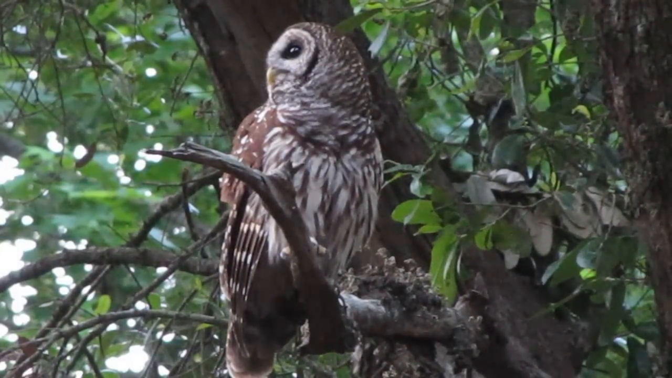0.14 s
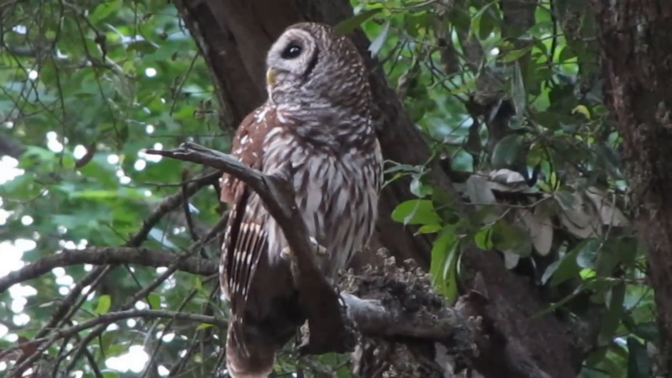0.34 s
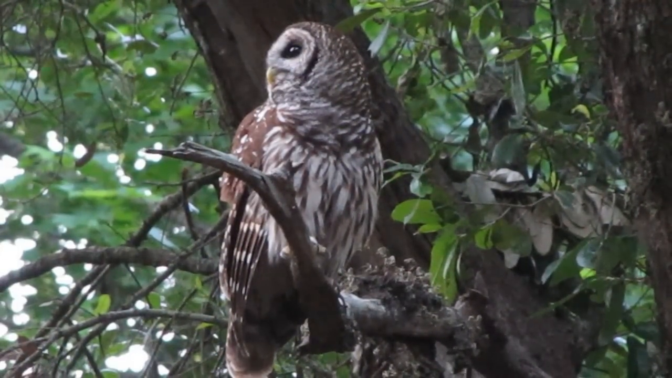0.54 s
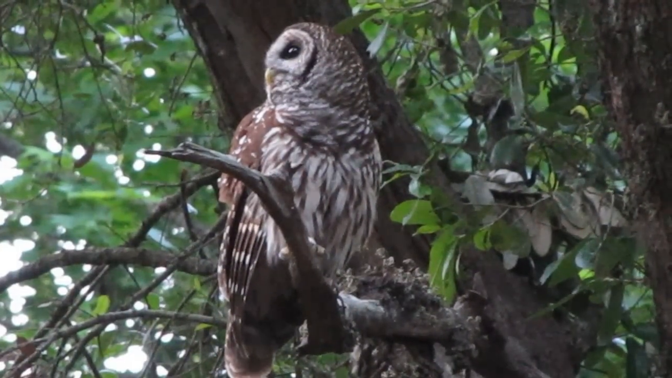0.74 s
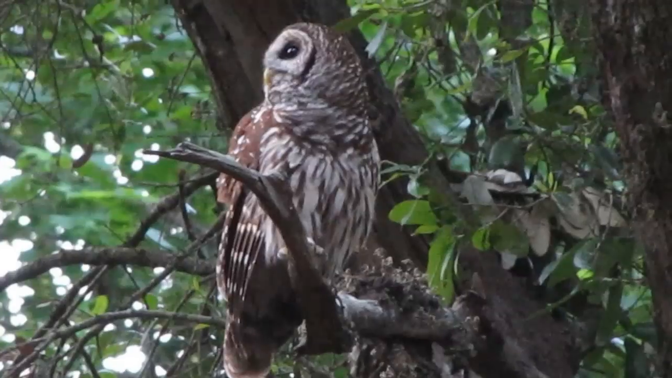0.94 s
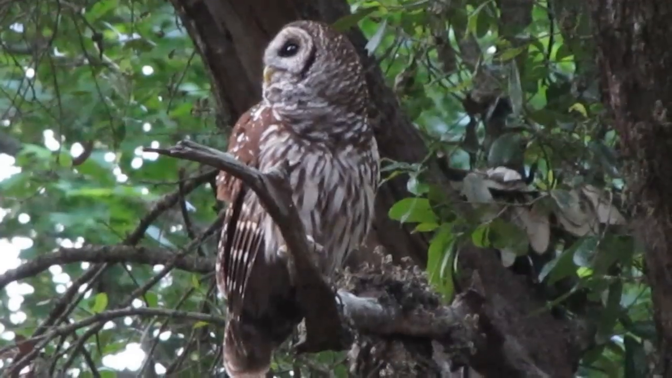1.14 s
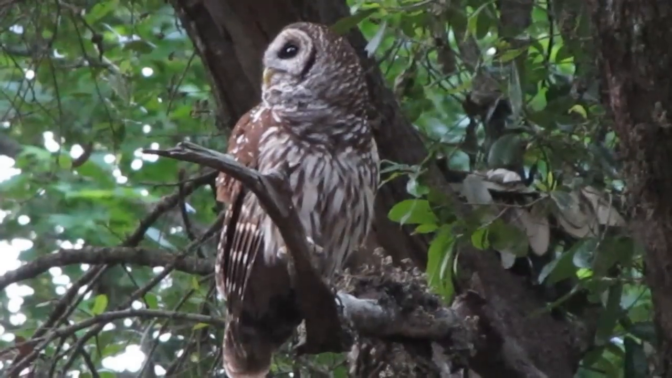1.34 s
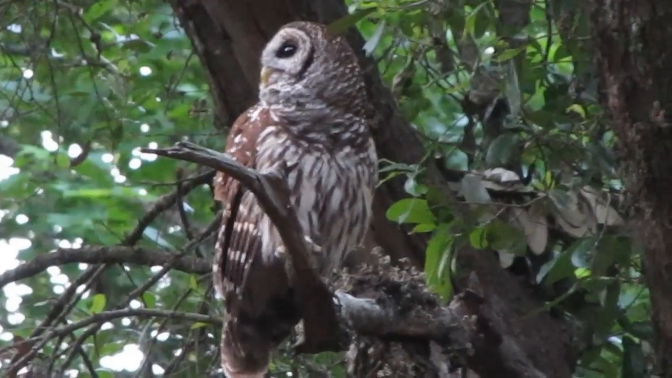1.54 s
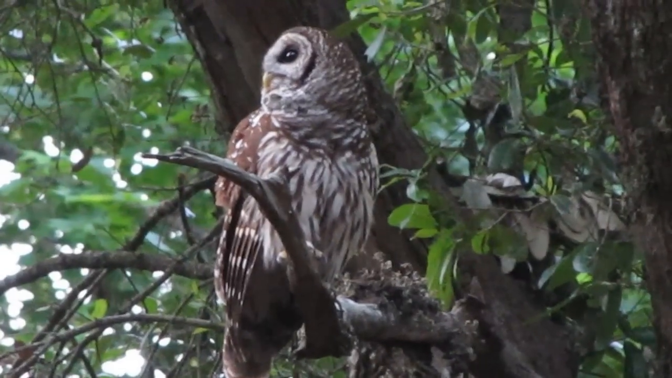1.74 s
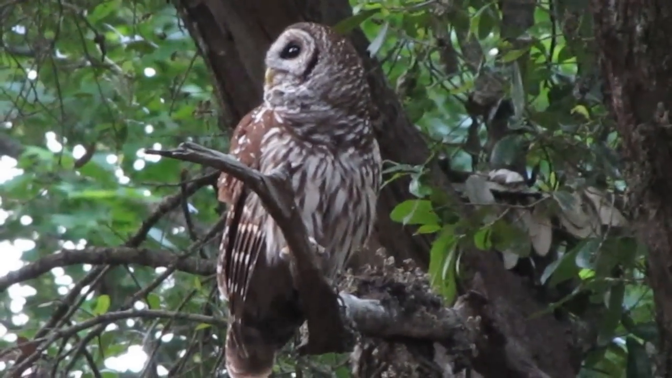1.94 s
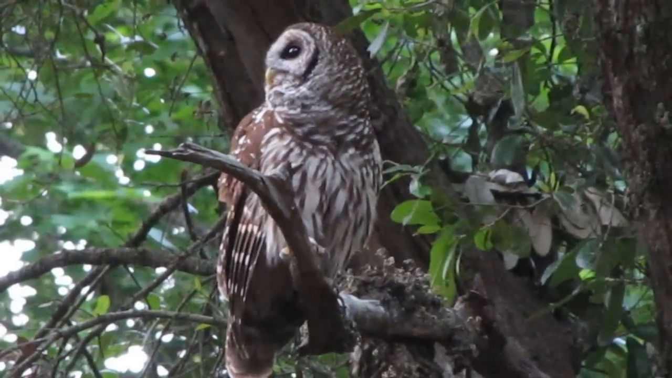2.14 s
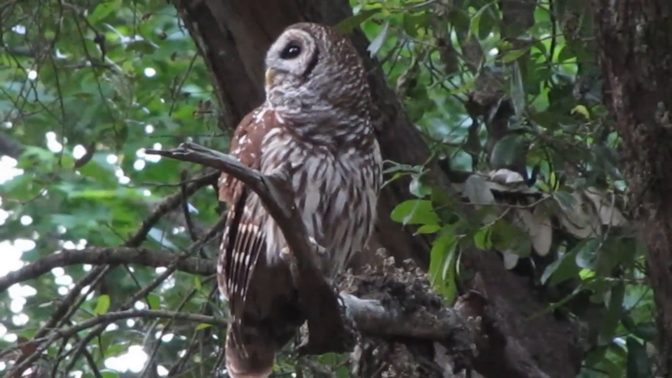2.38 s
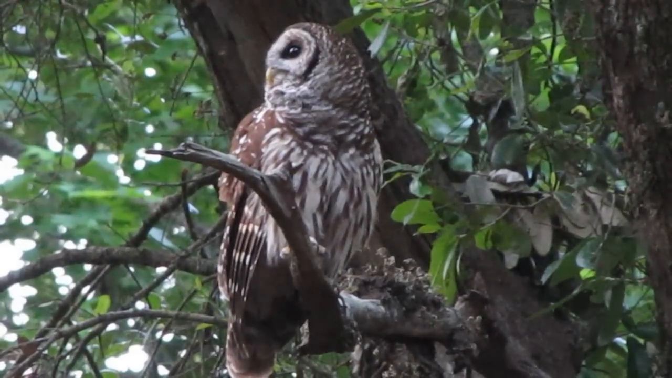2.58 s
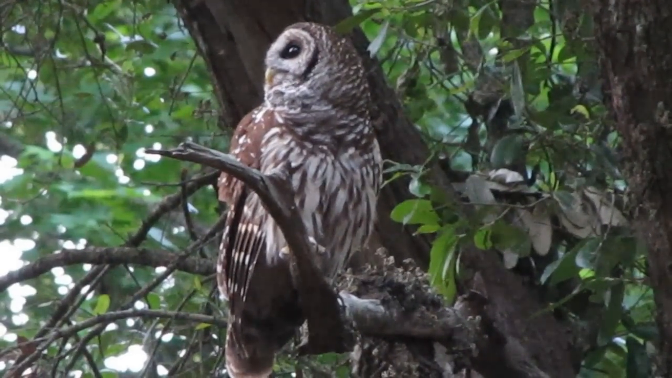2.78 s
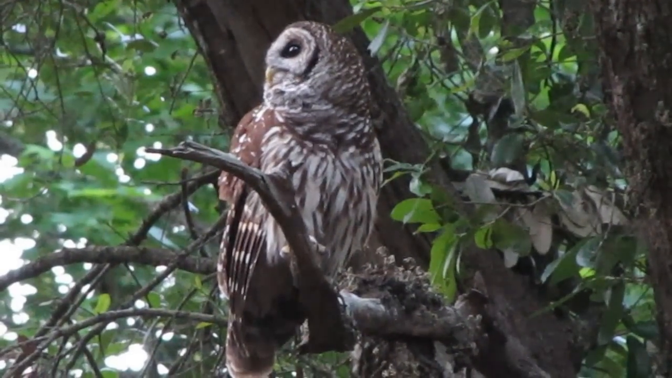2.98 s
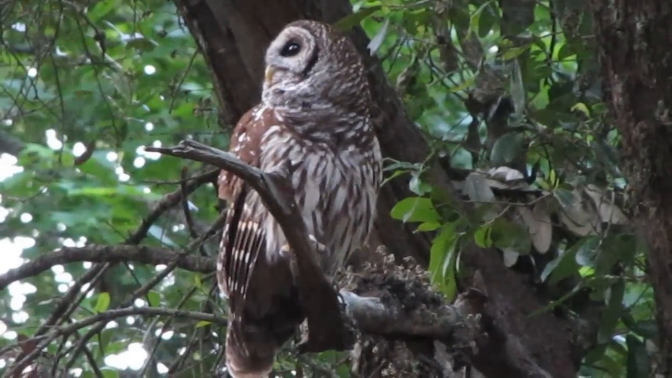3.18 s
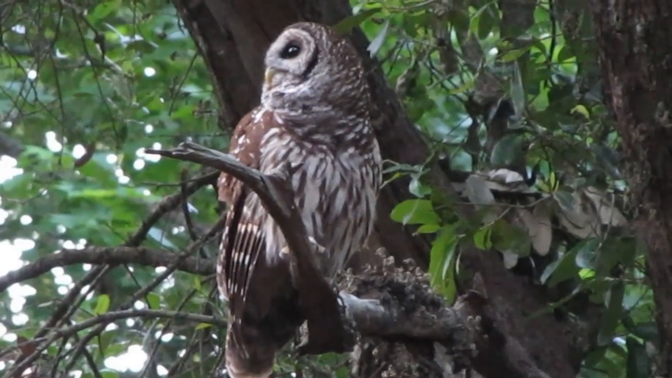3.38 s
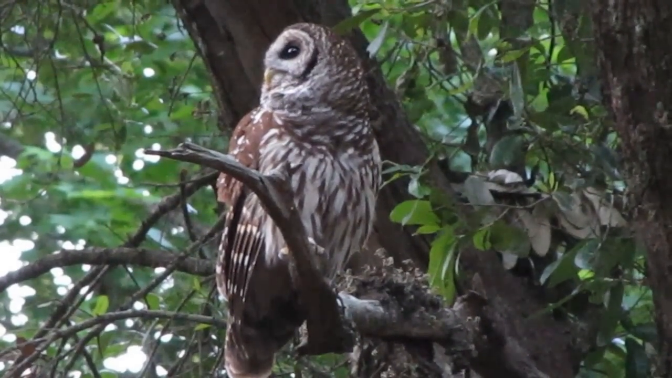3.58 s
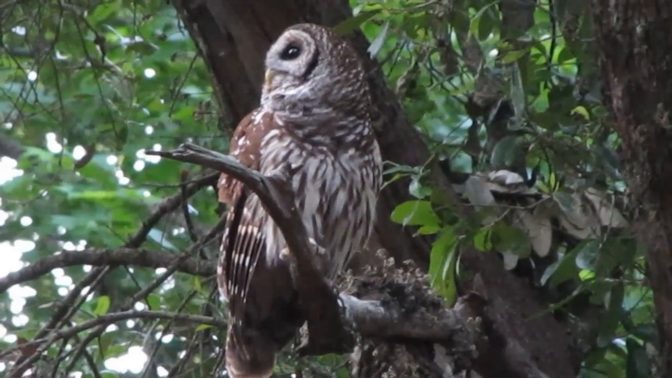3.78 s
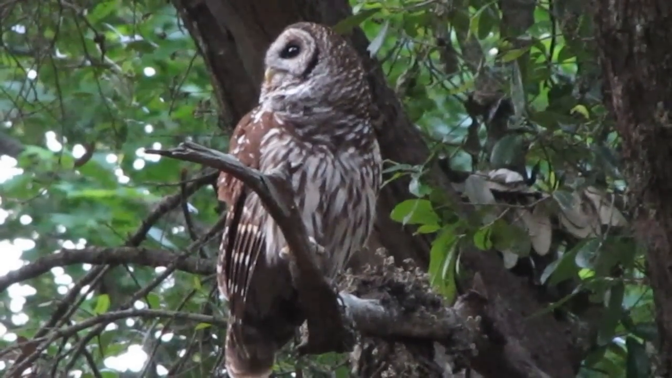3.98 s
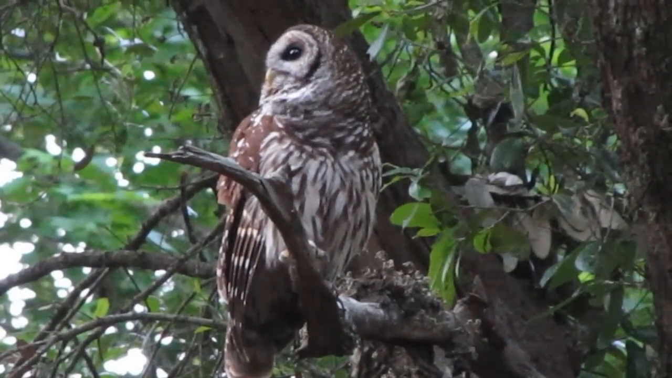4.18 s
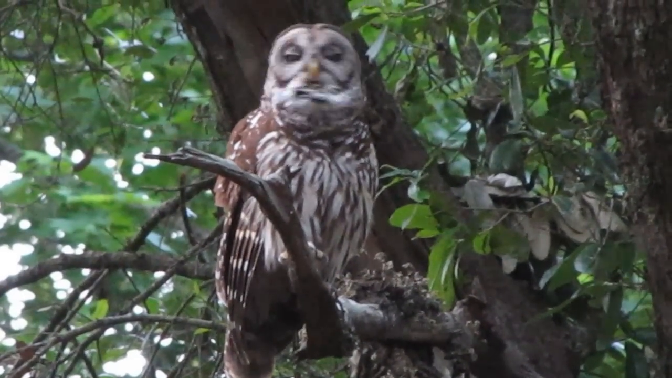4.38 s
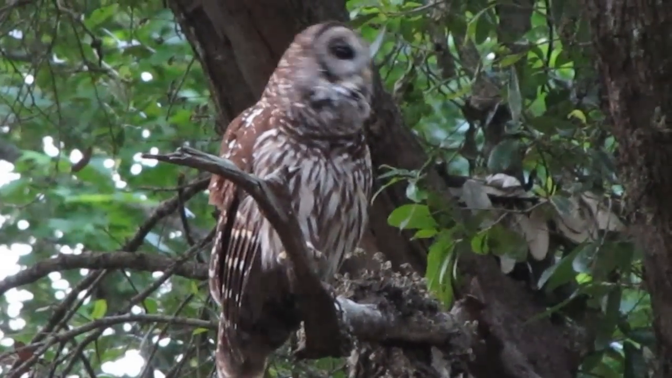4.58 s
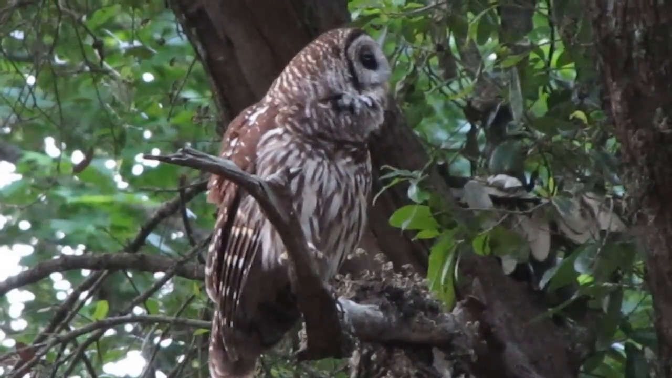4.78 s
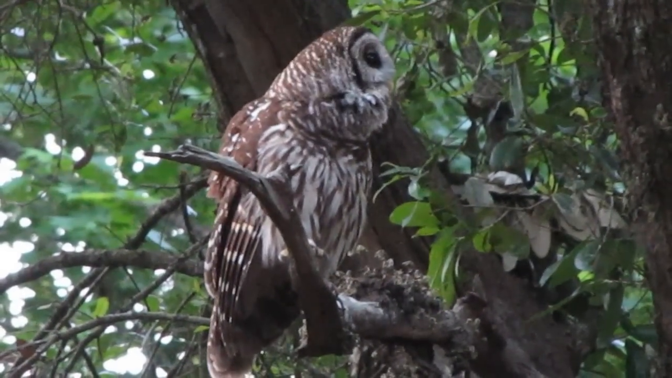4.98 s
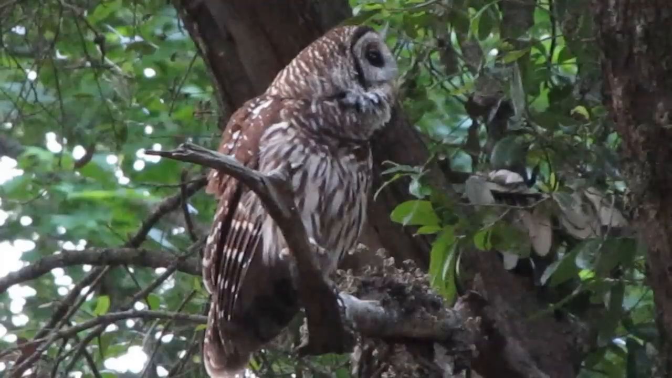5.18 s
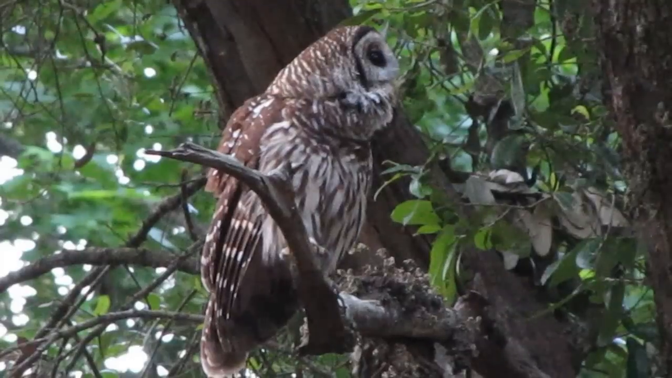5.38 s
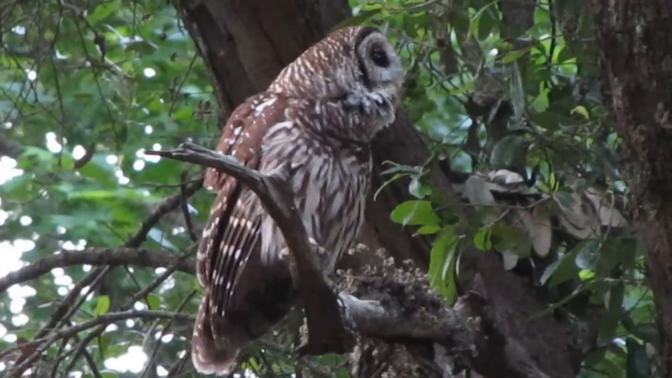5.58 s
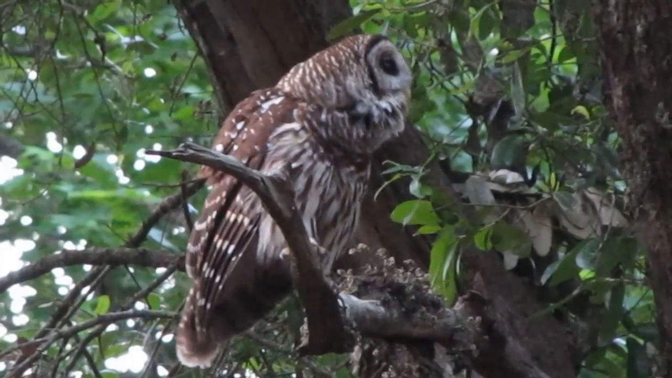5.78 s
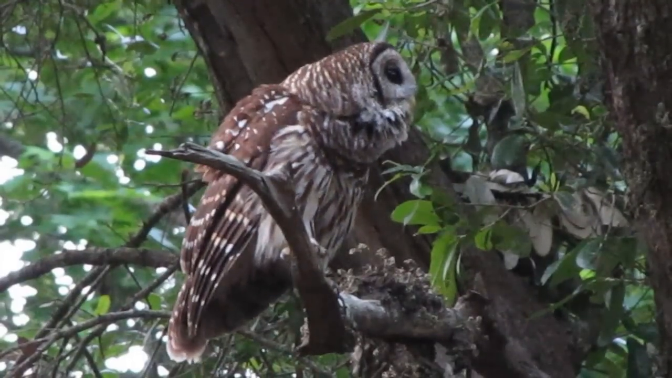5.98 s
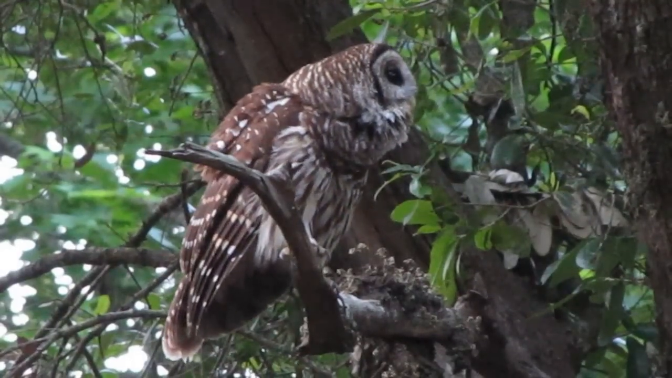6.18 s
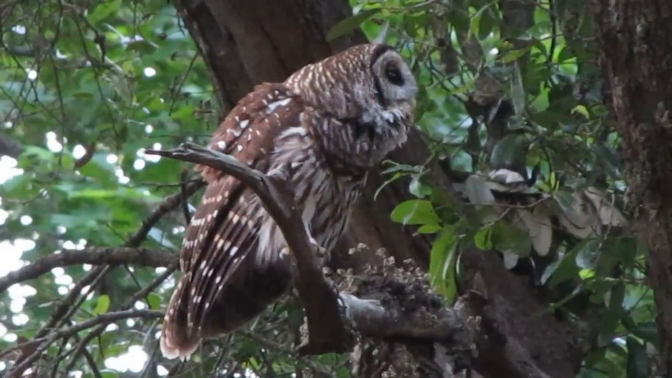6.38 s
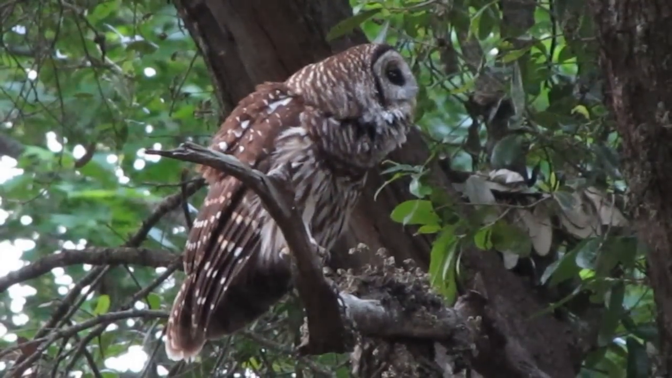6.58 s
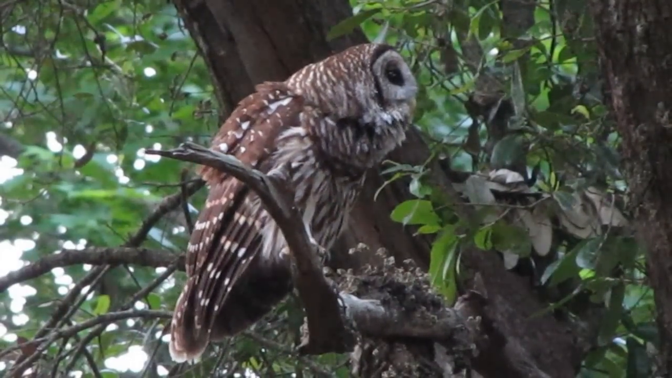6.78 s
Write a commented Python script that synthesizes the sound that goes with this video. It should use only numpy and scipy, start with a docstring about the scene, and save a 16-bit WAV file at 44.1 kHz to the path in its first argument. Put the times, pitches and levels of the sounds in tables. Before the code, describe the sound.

A steady high insect drone fills a quiet wood, with one insect trilling in repeated bursts. A quick run of distant woody knocks comes early, followed by sharp bird chips, faint whistles and a few drops tapping on leaves. A squirrel whines nasally several times. Near the end an owl close to the microphone gives one long, clear hoot that slides down and breaks into a low gargle.

```python
"""A barred owl in a wood gives one long hoot that slides down and breaks into a low gargle:
a nearly pure tone rings in its inflated throat until the membranes slacken and flutter.
Farther off, birds chip and whistle, a squirrel whines through its small throat, something woody
knocks in a quick run and drops tap on the leaves. One insect trills with its wings over a
droning chorus, and a far machine hums in the hush of the wood."""
import sys
import numpy as np
from scipy import signal
from scipy.fft import rfft, irfft, next_fast_len
from scipy.io import wavfile

SR = 44100
rng = np.random.default_rng(int(sys.argv[2]) if len(sys.argv) > 2 else 0)


def generate_wav(signal):
    """Clip the signal to [-1, 1] and save it as 16-bit WAV at the path in sys.argv[1]."""
    frames = np.transpose(np.atleast_2d(signal))
    scaled = np.clip(frames, -1, 1) * 32767
    pcm = np.round(scaled).astype(np.int16)
    wavfile.write(sys.argv[1], SR, pcm)


N = 301203
T = np.arange(N) / SR
BILL_OPENS_S = 5.704

# stereo image of the air, centred in the bass and wide on top: frequency_hz, left_right_likeness
AIR_LIKENESS = [(60, 1), (150, 0.65), (500, 0.5), (1100, 0.31), (2500, 0.052), (5000, 0.035)]


def owl(break_hz=470, jitter=0.0012, gargle_jitter=0.0173, flutter_db=2.0, rasp_db=-7, even_db=-5):
    """A nearly pure tone; once the pitch falls through the register break the membranes flutter."""
    # the inflated throat rings near 620 Hz: frequency_hz, gain_db
    throat = [(200, -4), (330, -1.5), (470, 7.5), (620, 9.5), (800, -4), (1000, -7.5), (1330, -20),
              (1900, -68)]
    # the open bill lets the overtones out: frequency_hz, gain_db
    bill = [(900, -5), (1350, -12), (1650, 6.5), (2050, 2.5), (2330, 4), (2620, 11.5), (2780, -4),
            (3350, -5.5), (4200, -17), (6000, -60)]
    pitch, tone_db, overtone_db, start_s = owl_contours()
    tone_db += echo_dip_db()
    overtone_db -= 25 * np.clip((BILL_OPENS_S - T) / 0.016, 0, 1)   # a closed bill holds them in
    slack = np.clip((break_hz - pitch) / 60, 0, 1)
    pitch = pitch * (1 + jitter * drift(42) + gargle_jitter * slack * drift(45.5))
    phase = phase_of(pitch)
    start = np.searchsorted(T, start_s)
    orders = np.arange(1, 17)[:, None]
    partials, voice = np.sin(orders * phase[start:]), np.zeros(N)
    # taut membranes swing symmetrically, which weakens the even harmonics
    symmetry_db = even_db * (orders % 2 == 0) * (1 - slack[start:])
    # the highest overtones come out last as the gape widens
    gape_db = -5 * orders * np.clip(1 - (T[start:] - BILL_OPENS_S) / .14, 0, 1)
    for shape, level_db in (throat, tone_db), (bill, overtone_db):
        gains = from_db(at_hz(shape, orders * pitch[start:]) + symmetry_db + gape_db)
        tone = np.sum(gains * partials, 0) / np.sqrt(np.sum(gains ** 2, 0) / 2)
        voice[start:] += from_db(level_db[start:]) * tone
    # air escapes in a puff on each slack cycle
    puffs = rms_one(resonate_twice(rng.standard_normal(N), 2700, 3100)) * (1 + np.sin(phase))
    voice += slack * puffs * from_db(overtone_db + rasp_db)
    fade_in = np.clip((T - T[start]) / 0.032, 0, 1)
    return voice * from_db(flutter_db * slack * drift(41)) * fade_in


def owl_contours(shake_hz=19.2, shake_depth=.025):
    """Pitch, tone level and overtone level through the hoot and its gargle, and the start time."""
    # the clear hoot scoops up, swells and slides down: time_s, pitch_hz, level_db
    hoot = [(5.64, 540, -37), (5.667, 662, -32), (5.72, 676, -32), (5.825, 685.3, -26.5),
            (5.95, 672.8, -24), (6.14, 662, -24.5), (6.279, 643, -21.5), (6.355, 574, -20),
            (6.4, 549.4, -18.7)]
    # the gargle that it breaks into: time_s, pitch_hz, level_db
    gargle = [(6.421, 510.5, -30), (6.435, 412, -25), (6.47, 368, -29.5), (6.525, 341, -34),
              (6.6, 324, -29.5), (6.75, 281, -33), (6.83, 209.2, -40)]
    times, pitches, levels = np.transpose(hoot + gargle)
    pitch, tone_db = np.interp(T, times, pitches), np.interp(T, times, levels)
    gargling = np.interp(T, [hoot[-1][0], gargle[0][0]], [0, 1])
    shake = shake_depth * gargling * np.sin(2 * np.pi * shake_hz * (T - gargle[0][0]))
    # overtones stay level while the hoot swells, then follow the tone in the gargle
    overtone_db = -40 * (1 - gargling) + gargling * (tone_db - 15.5)
    return pitch * (1 + shake), tone_db, overtone_db, times[0]


def echo_dip_db(centre_s=5.97, width_s=0.015, depth_db=-6.5):
    """A dip in level where echoes from the wood briefly cancel the held tone."""
    return depth_db * np.exp(-((T - centre_s) / width_s) ** 2)


def bill_click(peak_db=-26, t60=0.018):
    """The bill parts with a small wet click just after the hoot has begun."""
    # resonances of the bill: centre_hz, width_hz, gain_db
    modes = [(1060, 300, -9.5), (1450, 120, -12), (8500, 2000, -26)]
    out, t = np.zeros(N), T[:SR // 10]
    burst = rng.standard_normal(len(t)) * from_db(-60 * t / t60)
    click = sum(from_db(db) * resonate_twice(burst, hz, width) for hz, width, db in modes)
    add(out, BILL_OPENS_S, from_db(peak_db) * click / np.abs(click).max())
    return out


def bird_chips(sweep=.64, roughness=0.046, beat_db=-12, overtone_db=-27, scratch_db=-20.5):
    """Each chip shoots up to its top pitch with a bright scratch; most drop straight down again."""
    # sharp chips: centre_s, top_hz, half_length_s, level_db, fall_share
    chips = [(0.033, 3615, .011, -30.5, 1), (2.12, 5040, 0.015, -30, 0.23), (2.21, 4460, 0.009, -28, 0.78),
             (2.285, 5085, 0.023, -31, 0.28), (2.331, 3900, 0.017, -34.5, 0.96),
             (2.359, 4303, .012, -26.5, 0.95), (2.46, 3675, .011, -32, 0.93),
             (4.549, 5355, .018, -27, 0.16), (4.624, 4510, 0.012, -25.5, 1),
             (4.704, 3726, 0.014, -28.5, 0.9), (4.829, 3410, .012, -32.5, 0.96)]
    out, wobble = np.zeros(N), drift(610)
    grit = rms_one(resonate(rng.standard_normal(N), 510, 640))   # blurs the overtone into a rasp
    scratch = rms_one(resonate_twice(rng.standard_normal(N), 7300, width_hz=3800))
    for centre_s, top_hz, half_s, level_db, fall in chips:
        u = np.linspace(-1, 1, int(2 * half_s * SR))
        span = int(centre_s * SR) + np.arange(len(u))
        slide = np.where(u < 0, 1, fall) * np.sin(u * np.pi / 2) ** 2
        phase = phase_of(top_hz * (1 - sweep * slide) * (1 + roughness * wobble[span]))
        # the two sides of the syrinx sound a little apart, which thickens the note
        note = np.sin(phase) + from_db(beat_db) * np.sin(.87 * phase)
        note += from_db(overtone_db) * np.sin(2 * phase + 2 * grit[span])
        note += from_db(scratch_db) * scratch[span]
        add(out, centre_s - half_s, from_db(level_db) * np.cos(u * np.pi / 2) ** 1.03 * note)
    return out


def far_notes(waver=.011):
    """Far birds' slurs, plus two short low notes near 1.2 kHz from something else in the wood."""
    # pure glides that level off toward their end: start_s, length_s, from_hz, to_hz, relative_db
    notes = [(.02, 0.31, 2934, 2780, -49), (.275, 0.074, 3250, 3690, -43.5), (.31, 0.042, 7640, 7480, -43),
             (.899, .16, 2350, 3210, -52), (1.255, 0.062, 7230, 6760, -48.5), (1.646, .09, 2650, 3320, -52),
             (1.716, 0.06, 2620, 2670, -40.5), (1.729, 0.12, 7170, 7000, -49), (1.963, .1, 2510, 2950, -43),
             (2.579, 0.11, 2530, 2980, -46.5), (3.165, 0.19, 3630, 3150, -47.5),
             (4.509, .085, 1330, 1190, -38.5), (4.567, 0.0255, 1105, 1310, -29),
             (5.362, 0.15, 2560, 2817, -47), (5.477, .17, 3215, 2955, -47),
             (5.994, 0.093, 3100, 2804, -36.5), (6.38, 0.33, 2791, 2810, -40.5),
             (6.527, 0.16, 3535, 3410, -46), (6.561, 0.16, 3050, 3099, -42.5)]
    out, wobble = np.zeros(N), drift(62)
    for start_s, length_s, from_hz, to_hz, relative_db in notes + faint_slurs():
        u = np.linspace(0, 1, int(length_s * SR))
        pitch = from_hz + (to_hz - from_hz) * np.sin(u * np.pi / 2)
        pitch *= 1 + waver * np.roll(wobble, -int(start_s * SR))[:len(u)]
        envelope = from_db(relative_db) * np.sqrt(np.abs(np.sin(np.pi * u)))
        add(out, start_s, envelope * np.sin(phase_of(pitch)))
    return out


def faint_slurs(count=13, gap_s=.5, length_s=.14, pitch_hz=2387, spread=.1, rise=1.22, relative_db=-51.5):
    """Loosely spaced rising notes from birds deep in the wood."""
    slurs = []
    for k, (late, high) in enumerate(rng.random((count, 2))):
        from_hz = pitch_hz * (1 + spread * (2 * high - 1))
        slurs.append(((k + late) * gap_s, length_s, from_hz, from_hz * rise, relative_db))
    return slurs


def squirrel(flutter_db=2.5, waver=0.01175, hoarse_waver=.03, fade_s=0.034, arch_hz=10.85):
    """A nasal whine: many unsteady harmonics through a small throat, turning to a rasp when forced."""
    # formants of the small throat: frequency_hz, gain_db
    throat = [(700, -25), (1200, -14), (1600, -5), (2000, 3), (2400, -8), (2900, -4), (3600, -8),
              (6000, -19), (10000, -22), (12500, -40)]
    # whines: start_s, length_s, pitch_hz, glide_hz_per_s, level_db, hoarse_share
    whines = [(3.578, .25, 405.2, 45.5, -43.5, 0.27), (3.829, .29, 404, -97, -49.5, 0.03),
              (4.161, 0.16, 425, 20, -51.5, 0), (4.339, .34, 393, 50, -41, .35),
              (4.668, .28, 393.5, -74, -43, .1), (4.95, .15, 394.4, 90, -46.5, 0.07)]
    out, wobble, flutter = np.zeros(N), drift(13.65), from_db(flutter_db * drift(60))
    rasp = stereo_noise(throat, AIR_LIKENESS)[0]
    for start_s, length_s, hz, glide, level_db, hoarse in whines:
        calling = (T >= start_s) & (T < start_s + length_s)
        t = T[calling] - start_s
        arch = arch_hz * (np.sin(np.pi * t / length_s) - 2 / np.pi)
        pitch = hz + glide * (t - length_s / 2) + arch
        phase = phase_of(pitch * (1 + (waver + hoarse_waver * hoarse) * wobble[calling]))
        tone = sum(from_db(at_hz(throat, k * hz)) * np.sin(k * phase) for k in range(2, 27))
        voice = np.sqrt(1 - hoarse) * rms_one(tone) + np.sqrt(hoarse) * rasp[calling]
        envelope = np.clip(np.minimum(t, length_s - t) / fade_s, 0, 1)
        add(out, start_s, from_db(level_db) * envelope * voice)
    return out * flutter


def drops(t60=0.038, attack_s=0.0019, width_hz=420, upper_db=-4, splash_db=-19):
    """A short splash shakes a leaf, which rings dully in two modes either side of the tap's pitch."""
    # drops on leaves and bark: start_s, peak_db, pitch_hz
    hits = [(1.459, -37.5, 1080), (1.995, -33, 868), (2.714, -27.5, 753), (3.034, -32.5, 668),
            (3.415, -31, 1230), (4.307, -26.5, 690), (4.786, -25.5, 659), (5.011, -30, 960)]
    out, t = np.zeros(N), T[:SR // 10]
    for start_s, peak_db, hz in hits:
        splash = rng.standard_normal(len(t)) * from_db(-60 * t / t60) * np.minimum(t / attack_s, 1)
        bands = (0.96 * hz, width_hz, 0), (1.56 * hz, width_hz, upper_db), (2400, 2500, splash_db)
        tap = sum(from_db(db) * resonate_twice(splash, centre, width) for centre, width, db in bands)
        add(out, start_s, from_db(peak_db) * tap / np.abs(tap).max())
    return out


def knocks(count=15, first_s=.334, gap_s=.06429, slowing_s=.000734, loudest_s=1, attack_s=0.0025):
    """A far run that slows, swells and eases off; each knock rings the same modes with new strengths."""
    # woody modes: frequency_hz, gain_db, t60_s
    modes = [(677, -3.5, 0.032), (1020, 6, 0.019), (1150, 6.5, 0.017), (1310, 3, 0.018), (1924, 0, 0.025)]
    out, t = np.zeros(N), T[:SR // 10]
    for k in range(count):
        start_s = first_s + gap_s * k + slowing_s * k ** 2 / 2
        strike_db = -37.5 - 10 * (start_s - loudest_s) ** 2
        for hz, gain_db, t60 in modes:
            ring = np.sin(2 * np.pi * hz * t + rng.uniform(0, 2 * np.pi)) * np.minimum(t / attack_s, 1)
            add(out, start_s, ring * from_db(strike_db + gain_db + rng.normal(0, 2.7) - 60 * t / t60))
    return out


def insect_trill(length_s=.75, period_s=.03655, stroke_s=0.0095, from_hz=5970, to_hz=5470, level_db=-39):
    """Each wing stroke is a short tone that falls as the scraper slows; a trill swells at its start."""
    # the near insect's trills: start_s
    starts = [.186, 1.922, 3.464, 5.162, 6.72]
    out, u = np.zeros(N), np.linspace(0, 1, int(stroke_s * SR))
    for start_s in starts:
        for centre_s in np.arange(start_s, start_s + length_s, period_s):
            pitch = (from_hz + (to_hz - from_hz) * u) * (1 + 0.0035 * rng.standard_normal())
            stroke = np.sin(np.pi * u) * np.sin(phase_of(pitch))
            swell = min(0.73 + (centre_s - start_s) / 0.55, 1)
            add(out, centre_s - stroke_s / 2, swell * from_db(level_db + rng.normal(0, 1)) * stroke)
    return out


def insect_chorus(level_db=-37.5, slow_throb=0.054, fast_throb=0.16):
    """Countless insects blur into one band; the nearest ones throb through it."""
    # colour of the drone: frequency_hz, gain_db
    spectrum = [(3400, -57), (3850, -13.5), (4050, -0.5), (4400, 4), (4560, 0.5), (4800, -16), (5200, -10),
                (5750, -13), (6400, -25), (7800, -32), (8850, -18), (9500, -32), (12000, -33), (13200, -32)]
    throb = 1
    for rate_hz, depth in (11.5, slow_throb), (39.9, fast_throb):
        throb = throb + depth * np.sin(phase_of(rate_hz + 0.86 * drift(4)))
    drone = stereo_noise(spectrum, likeness=[(4000, -0.074), (9000, -0.0034)])
    return from_db(level_db) * throb * pan(drone, left_db=1.7)


def air(level_db=-46.0):
    """The hush of the wood, with a far machine humming in it."""
    # colour of the hush: frequency_hz, gain_db
    spectrum = [(20, -6.5), (40, -14.5), (60, 5.5), (110, -3), (200, -3.5), (500, -3.5), (1200, -3.5),
                (1450, -7.5), (2700, -4), (3600, -9), (7000, -14), (10500, -17), (12500, -27)]
    # the machine's narrow bands: centre_hz, width_hz, level_db
    hum_bands = [(59, 8.9, -65.5), (884, 18, -58), (956.5, 79, -56), (1088, 65, -53)]
    white = stereo_noise([(20, 0), (20000, 0)], AIR_LIKENESS)
    hum = sum(from_db(db) * rms_one(resonate_twice(white, hz, width)) for hz, width, db in hum_bands)
    hush = from_db(level_db + 0.34 * drift(4.7)) * stereo_noise(spectrum, AIR_LIKENESS)
    return pan(hush + hum, left_db=-1.15)


def wood(x, wet_db, alike, early_db, early_t60):
    """Near leaves scatter the sound at once; far trunks return a long tail whose treble dies first."""
    # decay among the trunks: frequency_hz, t60_s
    decay = [(200, 2.5), (650, 1.3), (2000, 1.1), (5000, 1.57), (12000, 0.077)]
    t, tail = T[:SR], 0
    edges_hz = np.geomspace(150, 14000, 8)
    for low, high in zip(edges_hz, edges_hz[1:]):
        band = signal.butter(2, [low, high], "band", fs=SR, output="sos")
        mid, side = signal.sosfilt(band, rng.standard_normal((2, SR)))
        trunks = from_db(-60 * t / at_hz(decay, np.sqrt(low * high)))
        leaves = from_db(early_db - 60 * t / early_t60)
        tail = tail + (mid + np.sqrt(1 - alike) * side * [[1], [-1]]) * (trunks + leaves)
    tail = tail * np.clip(t / 0.0033, 0, 1) ** 2
    tail = tail / np.sqrt(np.sum(tail ** 2) / 2)
    return x + from_db(wet_db) * signal.fftconvolve(x[None], tail, axes=1)[:, :N]


def from_db(db):
    """Decibels to gain."""
    return 10 ** (np.asarray(db) / 20)


def rms_one(x):
    """Scale to unit power."""
    return x / np.sqrt(np.mean(x ** 2) + 1e-20)


def phase_of(hz):
    """Running phase of a moving pitch, in radians."""
    return 2 * np.pi * np.cumsum(hz) / SR


def at_hz(points, hz):
    """Read a curve on a log-frequency axis."""
    frequencies, values = np.transpose(points)
    return np.interp(np.log(np.maximum(hz, 1)), np.log(frequencies), values)


def drift(rate_hz):
    """Smooth random modulation, rms about 1."""
    step, settle = 40, 2000
    r = np.exp(-2 * np.pi * step * rate_hz / SR)
    noise = rng.standard_normal(N // step + settle + 2)
    slow = signal.lfilter([1], [1, -2 * r, r * r], noise)[settle:]
    return np.interp(np.arange(N) / step, np.arange(len(slow)), rms_one(slow))


def resonate(x, hz, width_hz):
    """A resonance with gain 1 on top."""
    r = np.exp(-np.pi * width_hz / SR)
    feedback = [1, -2 * r * np.cos(2 * np.pi * hz / SR), r * r]
    return signal.lfilter(np.array([1, 0, -1]) * (1 - r * r) / 2, feedback, x)


def resonate_twice(x, hz, width_hz):
    """Two equal resonances in series, for steeper skirts."""
    return resonate(resonate(x, hz, width_hz), hz, width_hz)


def stereo_noise(spectrum, likeness):
    """Coloured noise whose two sides are partly alike; rms 1."""
    size = next_fast_len(N)
    mid, side = rfft(rng.standard_normal((2, size)))
    hz = np.arange(len(mid)) * SR / size
    alike = np.clip(at_hz(likeness, hz), -1, 1)
    both = np.sqrt(1 + alike) * mid + np.sqrt(1 - alike) * side * [[1], [-1]]
    return rms_one(irfft(both * from_db(at_hz(spectrum, hz)), size)[:, :N])


def pan(x, left_db):
    """Place a source between the two sides."""
    return x * from_db([[left_db / 2], [-left_db / 2]])


def add(track, start_s, sound):
    """Mix a short sound into a track."""
    start = max(round(start_s * SR), 0)
    track[start:start + len(sound)] += sound[:max(N - start, 0)]


def scene():
    """The owl is close and nearly dry; the other calls and the taps come through the trees."""
    hoot = wood(owl() + bill_click(), wet_db=-15, alike=.8, early_db=-15, early_t60=.2)
    chatter = wood(bird_chips(), wet_db=0, alike=0.14, early_db=4.5, early_t60=0.26)
    notes = from_db(-4.5) * wood(far_notes(), wet_db=2, alike=.3, early_db=2, early_t60=.2)
    whine = pan(wood(squirrel(), wet_db=-5, alike=0.26, early_db=-3, early_t60=0.63), left_db=-2.5)
    taps = wood(drops() + knocks(), wet_db=-2.5, alike=0.28, early_db=23, early_t60=0.091)
    trill = pan(wood(insect_trill(), wet_db=-9, alike=.1, early_db=6, early_t60=0.27), left_db=7.5)
    return hoot + chatter + notes + whine + taps + trill + insect_chorus() + air()


def record(dry, cutoff_hz=13700):
    """A steep low-pass takes off the very top."""
    return signal.sosfilt(signal.ellip(10, .1, 80, cutoff_hz, fs=SR, output="sos"), dry)


dry = scene()
out = record(dry)
generate_wav(out)
```